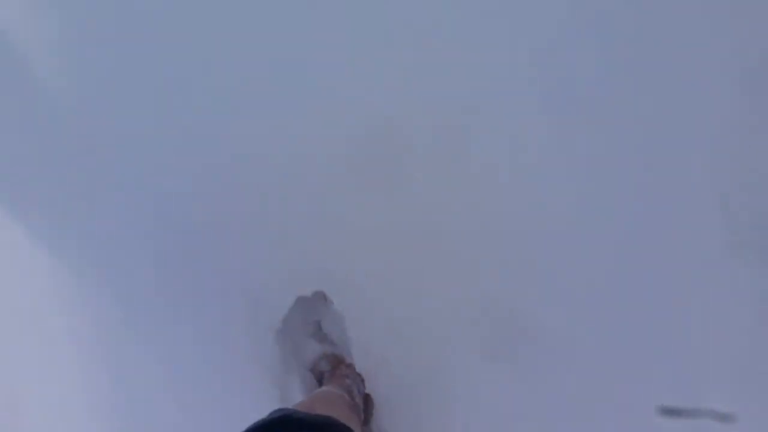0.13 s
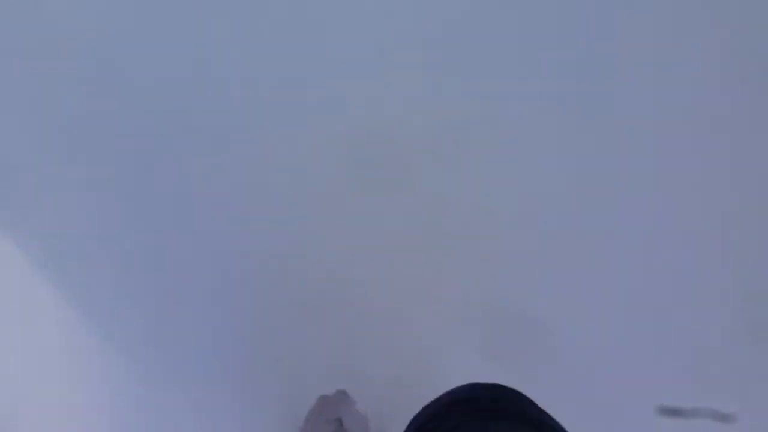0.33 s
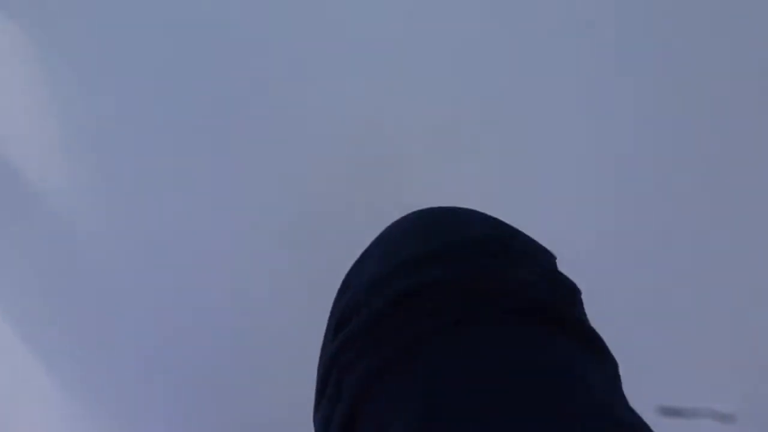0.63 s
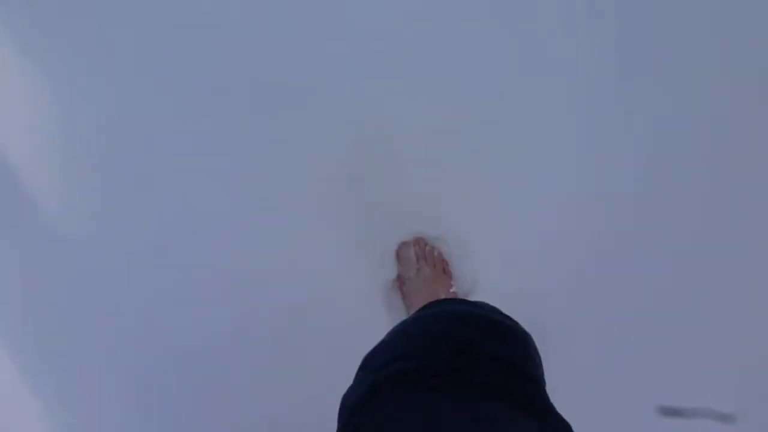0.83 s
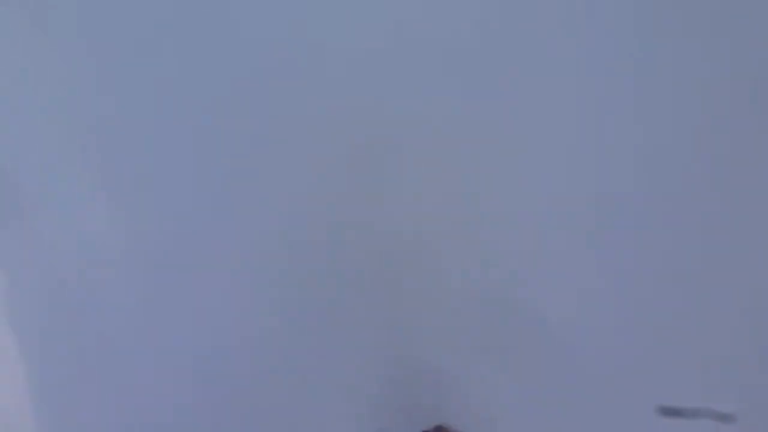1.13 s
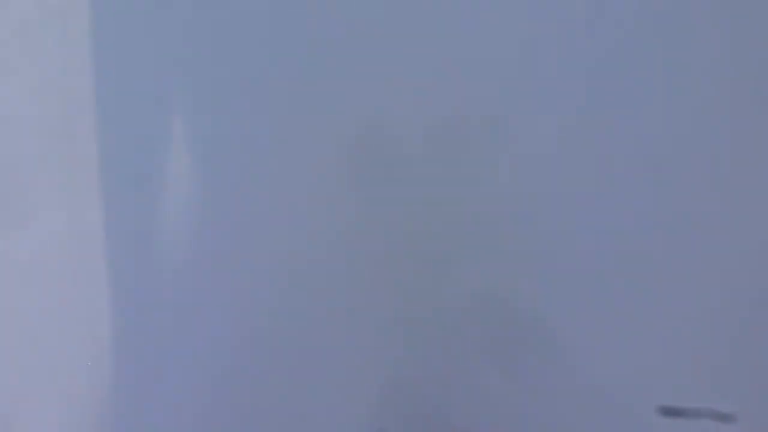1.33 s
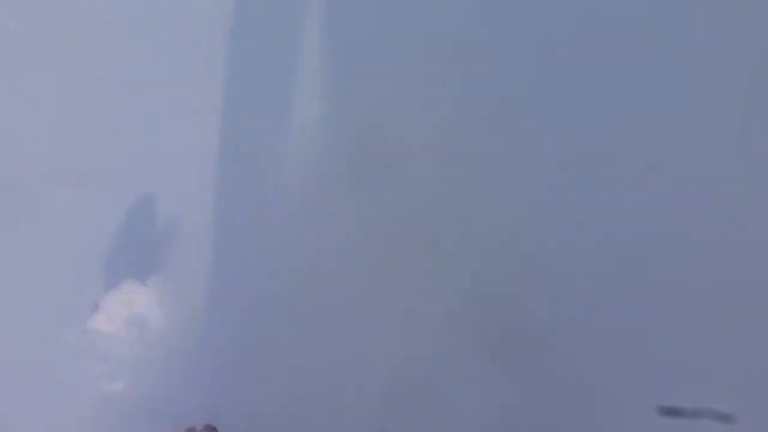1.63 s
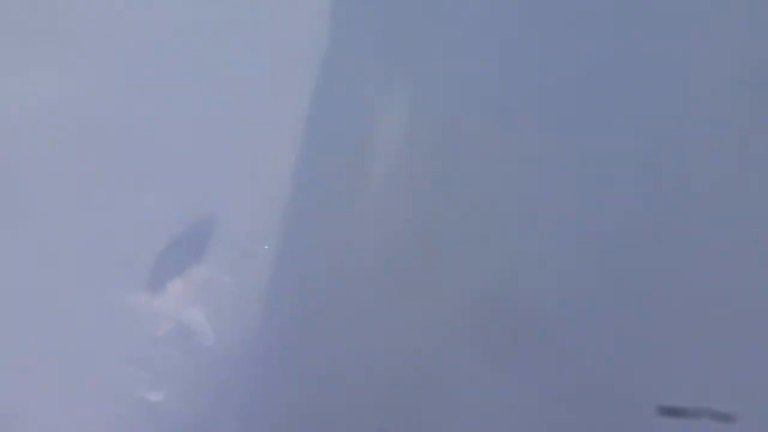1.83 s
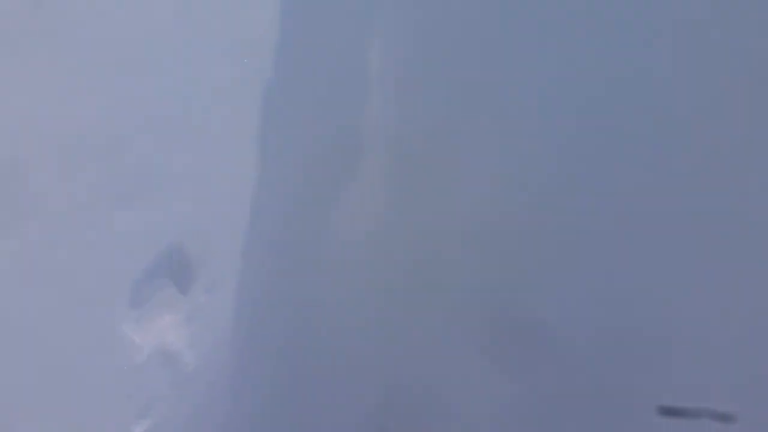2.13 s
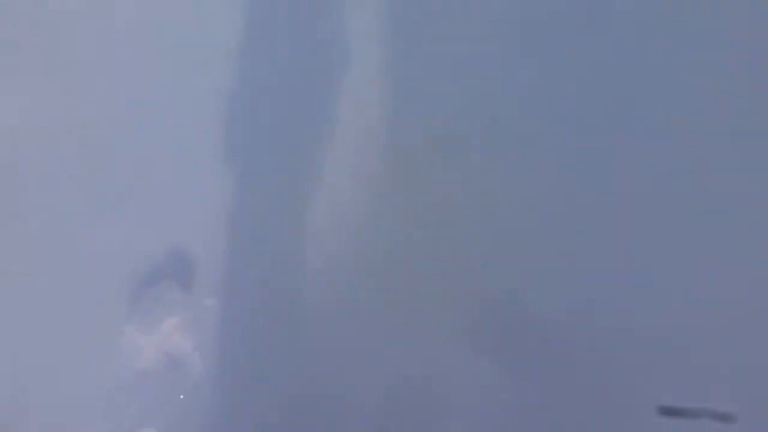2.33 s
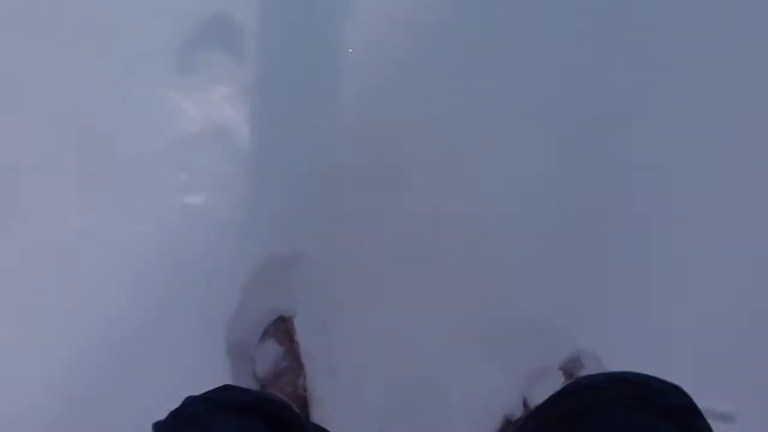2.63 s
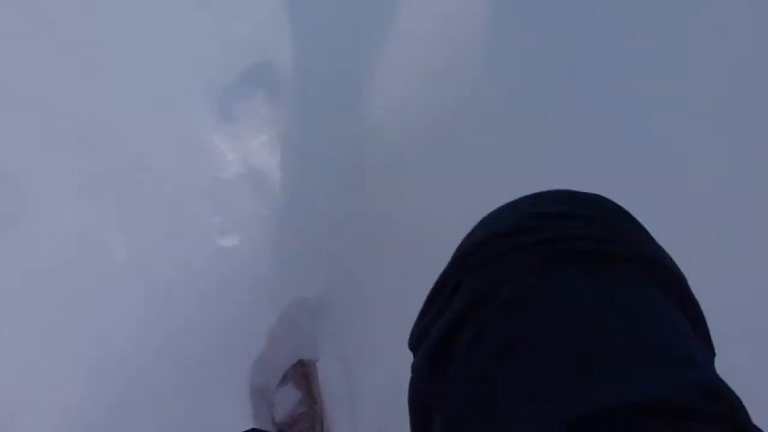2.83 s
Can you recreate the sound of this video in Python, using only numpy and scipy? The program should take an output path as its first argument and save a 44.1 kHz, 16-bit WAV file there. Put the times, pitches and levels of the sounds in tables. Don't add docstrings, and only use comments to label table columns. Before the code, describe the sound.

Close handheld outdoor pickup of barefoot snow steps, grainy and crackling, the second much the loudest, the third softer, with small crust cracks between them, low wind thuds, soft gust roar and a dull, muffled treble.

```python
import sys
import numpy as np
from scipy import signal
from scipy.fft import rfft, irfft, next_fast_len
from scipy.io import wavfile
from scipy.ndimage import uniform_filter1d

SR = 44100
rng = np.random.default_rng(int(sys.argv[2]) if len(sys.argv) > 2 else 0)


def to_wav(s):
    ch = np.atleast_2d(s).T
    pcm = np.round(np.clip(ch, -1, 1) * 32767)
    wavfile.write(sys.argv[1], SR, pcm.astype(np.int16))


def level_to_linear(level):
    exponent = np.asarray(level, float) / 20
    return 10 ** exponent


N = 130977

# time in seconds, crunch level in dB, packing level in dB relative to crunch, fine crystal
# level in dB relative to crunch.
FOOT_PRESSURE = [
    [(.18, -60.5, 9, -16), (.26, -46.5, 11.5, -13), (.3, -42.5, 9, -24), (.32, -47, 16, -17),
     (.345, -39.5, 9, -15.5), (.375, -43.5, 15, -13), (.42, -48.5, 11, -14), (.435, -52, 10.5, -3.5),
     (.52, -54.5, 5, -9)],
    [(.735, -42.5, 5, 1), (.748, -34, 1.5, -3.5), (.8, -32, -3.5, -4.5), (.87, -39, 1.5, -0.5),
     (.92, -35, -3.5, -5.5), (.99, -41, 5.5, -7.5), (1.1, -36.5, -3.5, -14.5), (1.27, -40.5, -1.5, -6),
     (1.348, -41.5, 4.5, -7.5)],
    [(1.89, -54.5, 7, -1), (1.93, -44, 5, -4), (1.99, -46.5, 5, -3.5), (2.08, -46.5, 4.5, -4),
     (2.16, -48, 5.5, -8), (2.225, -44, 4, -7), (2.3, -48, 2, -9.5), (2.4, -52, 4, -12), (2.45, -56, 0, 2)],
    [(1.34, -46.5, -14, -10), (1.46, -47.5, 4.5, -6), (1.51, -47, 5, -6.5), (1.56, -49.5, 8.5, -3),
     (1.59, -56.5, 3, -5.5), (1.64, -50.5, 7, 0), (1.68, -48, 8.5, -1.5), (1.76, -49.5, 7.5, 0),
     (1.9, -54, 9.5, 0)],
    [(2.44, -56.5, 9, -6), (2.5, -51.5, 7, -4), (2.56, -62.5, 6, -12), (2.64, -60, 10, -10),
     (2.75, -54, 5, -6), (2.8, -57, 2, -5), (2.85, -48.5, -1, -12), (2.9, -52, 6, -3), (2.98, -63, 10, -8)],]
# start in seconds, length in seconds (at most 0.16 s sounds), level in
# dB, centre in Hz, half bandwidth as a share of the centre (0-1).
CRUST_CLUMPS = [(.225, .002, -34, 900, .5), (.27, .15, -45, 1450, .25), (.328, .016, -43, 4300, .22),
                (.38, .042, -45, 4400, .25), (.43, .3, -60, 4150, .07), (.442, .022, -36, 800, .1),
                (.76, .57, -46, 1800, .22), (.795, .006, -36, 4500, .4), (.81, .045, -42, 3300, .12),
                (.908, .018, -42, 3900, .25), (1.0, .335, -48, 6000, .1), (1.24, .1, -44, 2900, .25),
                (1.53, .03, -49, 4800, .35), (1.572, .004, -44, 4300, .65), (1.606, .006, -53, 4800, .5),
                (1.66, .62, -50, 1300, .3), (1.675, .008, -46, 3800, .5), (1.745, .008, -46, 3800, .5),
                (1.94, .025, -49, 4900, .15), (2.14, .14, -58, 5500, .03), (2.417, .002, -35, 800, .5),
                (2.657, .012, -33, 490, .2), (2.673, .002, -35, 1400, .6)]
# start in seconds, peak in dB, pitch in Hz, 60 dB decay in seconds.
CRUST_CRACKS = [(.2245, -27, 800, .006), (.274, -29, 1020, .012), (.3005, -30, 2300, .006),
                (.333, -25, 950, .02), (.3478, -19, 1050, .014), (.3515, -23, 900, .012),
                (.366, -20, 840, .02), (.371, -24, 800, .02), (.388, -28, 1100, .015),
                (.4295, -26, 800, .008), (.491, -31, 660, .02), (.7452, -23, 2300, .006),
                (.7745, -21, 900, .006), (.7747, -28, 5200, .004), (.798, -23, 4000, .005),
                (.846, -27, 620, .03), (.921, -28, 3900, .006), (1.126, -27, 600, .02),
                (1.148, -27, 2600, .005), (1.221, -28, 2700, .008), (1.2926, -29, 2590, .008),
                (2.077, -30, 650, .015), (2.102, -29, 900, .008), (2.143, -32, 1700, .008),
                (2.205, -29, 900, .012), (2.4175, -27, 800, .006), (2.6555, -31, 600, .012)]
# centre in seconds, peak in dB, pitch in Hz, width in seconds.
WIND_POPS = [(0.18, -24.5, 257, 0.0089), (0.211, -23, 330, 0.0022), (0.228, -22.5, 231, 0.0069),
             (0.407, -33, 366, 0.0034), (0.75, -14.5, 379, 0.0041), (0.775, -31, 354, 0.0032),
             (0.802, -36, 405, 0.011), (1.008, -29, 369, 0.0072), (1.046, -24.5, 301, 0.006),
             (1.083, -49, 353, 0.0062), (1.342, -14.5, 330, 0.0032), (1.357, -24, 256, 0.0021),
             (1.424, -24, 277, 0.0044), (1.473, -23.5, 260, 0.0036), (1.485, -17, 260, 0.0048),
             (1.504, -27, 304, 0.0027), (1.578, -22.5, 285, 0.0038), (1.608, -27.5, 227, 0.0049),
             (1.619, -29, 299, 0.0072), (1.724, -40.5, 201, 0.0045), (1.749, -23.5, 254, 0.0043),
             (1.874, -32.5, 287, 0.008), (1.962, -26.5, 219, 0.0062), (2.228, -29, 270, 0.0087),
             (2.37, -25, 320, 0.0034), (2.389, -26, 305, 0.0048), (2.42, -19.5, 275, 0.0038),
             (2.672, -25.5, 296, 0.0053)]
# centre in seconds, peak in dB, pitch in Hz, width in
# seconds.
WIND_FLUTTER = [(.13, -40.5, 85, .015), (.32, -46, 80, .012), (1.3355, -22, 370, .004),
                (1.3465, -27, 330, .003), (1.398, -35, 190, .007), (1.483, -27, 300, .003),
                (1.492, -30, 200, .006), (1.53, -41, 90, .012), (1.543, -32, 300, .006),
                (1.586, -32, 170, .007), (1.68, -33, 220, .007), (1.83, -41, 90, .012),
                (1.868, -28, 300, .005), (1.945, -34, 140, .009), (2.1, -43, 80, .014),
                (2.235, -38, 110, .012), (2.315, -38, 100, .015), (2.67, -38, 120, .01),
                (2.705, -35, 160, .008), (2.905, -43, 80, .014)]
# time in seconds, rumble level in dB, open air level in dB.
GUST_CURVE = [(0, -66.5, 2), (.13, -65, 4), (.25, -62, 5.5), (.33, -77.5, 2.5), (.72, -84.5, 2),
              (.76, -42.5, 7.5), (.85, -79, 2.5), (1.25, -60, 2.5), (1.38, -52, -1.5), (1.62, -51.5, -6),
              (1.85, -48.5, -3.5), (2, -62.5, -1.5), (2.12, -60.5, 1.5), (2.32, -52.5, -1),
              (2.43, -54.5, 2), (2.47, -66, -1), (2.68, -69, 1), (2.97, -70.5, -0.5)]
# frequency in Hz, level in dB.
RUMBLE_SPECTRUM = [(30, -29.5), (80, -4.5), (150, 0), (280, -1.5), (450, -4.5), (700, -42.5)]
# frequency in Hz, level in dB.
AIR_SPECTRUM = [(40, -52), (130, -46), (260, -6), (700, -2.5), (1100, -8.5), (1900, -24.5), (3600, -24.5),
                (5000, -32.5)]
# frequency in Hz, gain in dB.
BAND_EDGE = [(5000, -1), (6500, -6.5), (7200, -16.5), (7600, -28.5), (7780, -34.5), (7850, -67)]


def evened(x):
    return x / np.sqrt(np.mean(x ** 2) + 1e-20)


def read(points, hz):
    f, value = np.transpose(points)
    return np.interp(np.log(hz + 1), np.log(f + 1), value)


def along(rows, axis):
    rows = np.array(rows)
    return np.interp(np.arange(N) / SR, rows[:, 0], rows[:, axis])


def add(mix, s, sound):
    part = mix[round(s * SR):][:len(sound)]
    part += sound[:len(part)]


def grains(span_hz, per_s, cycles, spread_db, count=24):
    size = level_to_linear(spread_db * np.minimum(rng.exponential(1, N), 3.2))
    size = size * rng.choice([-1, 1], N)
    size = size * (rng.random(N) < per_s / SR)
    kind = rng.integers(0, count, N)
    t, out = np.arange(1024) / SR, np.zeros(N)
    for k, hz in enumerate(np.geomspace(*span_hz, count)):
        u = t * hz / cycles
        snap = u * np.exp(-2 * u) * np.sin(2 * np.pi * hz * t)
        out += signal.oaconvolve(size * (kind == k), snap)[:N]
    return evened(out)


def snow():
    crunch = grains((2297, 4220), per_s=6000, cycles=4.2, spread_db=2.0)
    packing = grains((480.4, 2075), per_s=2500, cycles=2.93, spread_db=3.8)
    fine = grains((4410, 7720), per_s=8300, cycles=2.9, spread_db=6.2)
    t, out = np.arange(N) / SR, np.zeros(N)
    for step in FOOT_PRESSURE:
        start, end = step[0][0], step[-1][0]
        gate = np.clip(np.minimum(t - start, end - t) / 0.01, 0, 1)
        mix = crunch + level_to_linear(along(step, axis=2)) * packing + level_to_linear(along(step, axis=3)) * fine
        out += gate * level_to_linear(along(step, axis=1)) * mix
    return out


def clumps():
    rise_s, out = .0018, np.zeros(N)
    for s, length, db, hz, share in CRUST_CLUMPS:
        wide = np.clip(share, .02, .7)
        edges = [hz * (1 - wide), hz * (1 + wide)]
        sos = signal.butter(4, edges, "band", fs=SR, output="sos")
        band = signal.sosfilt(sos, rng.standard_normal(8192))[1024:]
        t = np.arange(len(band)) / SR
        shape = np.clip(np.minimum(t, length + rise_s - t) / rise_s, 0, 1)
        rms = np.sqrt(np.mean((band ** 2)[shape > .5]))
        add(out, s, level_to_linear(db) * shape * band / rms)
    return out


def cracks():
    rise_s, sag = .0004, .08
    out, t = np.zeros(N), np.arange(2048) / SR
    for s, db, hz, t60 in CRUST_CRACKS:
        pitch = hz * (1 - sag * np.minimum(t / t60, 1))
        turns = np.cumsum(pitch) / SR
        envelope = level_to_linear(db - 60 * t / t60) * (1 - np.exp(-t / rise_s))
        add(out, s, envelope * 2 * np.sin(2 * np.pi * turns))
    return out


def pops():
    fall, span, edge = 0.35, 1.23, 0.26
    out = np.zeros(N)
    for s, db, hz, width in WIND_POPS + WIND_FLUTTER:
        u = np.arange(-1, 4, 1 / (SR * width * span))
        shape = np.where(u < 0, np.exp(-(u / edge) ** 2), np.exp(-u / .5))
        turns = np.cumsum(hz * np.exp(-fall * np.clip(u, -1, 1.5))) / SR
        phase = 2 * np.pi * (turns - np.interp(0, u, turns))
        swing = np.cos(phase) + 0.059 * np.cos(2 * phase)
        add(out, s - width * span, level_to_linear(db) * shape * swing)
    return out


def gain_control():
    duck_per_db, duck_from_db, recover_s = 0.1266, -31.5, 0.096
    kicks = np.zeros(N)
    for s, db, _, _ in WIND_POPS:
        kick = max(db - duck_from_db, 0) * duck_per_db
        add(kicks, s + 0.0019, np.array([kick]))
    dip = signal.lfilter([1], [1, -np.exp(-1 / (SR * recover_s))], kicks)
    return level_to_linear(-uniform_filter1d(dip, size=200))


def noise(spectrum, size, patchy_db, flicker_db):
    frames, hz = 4 * N // size + 5, np.fft.rfftfreq(size, 1 / SR)
    a, b, patches = rng.standard_normal((frames, len(hz), 3)).T
    patches = uniform_filter1d(patches, size=size // 64, axis=0)
    patches = evened(uniform_filter1d(patches, size=8, axis=1))
    flicker = evened(uniform_filter1d(rng.standard_normal(frames), size=4))
    level_db = read(spectrum, hz)[:, None] + patchy_db * patches + flicker_db * flicker
    z = (a + 1j * b) * level_to_linear(level_db)
    return evened(signal.istft(z, nperseg=size, noverlap=3 * size // 4)[1][:N])


def rumble():
    roar = noise(RUMBLE_SPECTRUM, size=1024, patchy_db=2.0, flicker_db=3.5)
    return level_to_linear(along(GUST_CURVE, axis=1) + 6.5) * roar


def open_air():
    hiss = noise(AIR_SPECTRUM, size=512, patchy_db=-0.17, flicker_db=1.2)
    return level_to_linear(along(GUST_CURVE, axis=2) - 38.5) * hiss


def scene():
    heard = open_air() + snow() + clumps() + cracks()
    return (heard * gain_control() + rumble() + pops())[None]


def roll_off(x):
    return signal.sosfilt(signal.butter(12, 15720, fs=SR, output="sos"), x)


def record(dry):
    sample_hz, image_db = 16000, -63.5
    cut = signal.sosfilt(signal.butter(4, 75, "high", fs=SR, output="sos"), dry)
    cut = .3 * np.tanh(cut / .3)
    size = next_fast_len(N + 4096)
    hz = np.fft.rfftfreq(size, 1 / SR)
    band = irfft(rfft(cut, size) * level_to_linear(read(BAND_EDGE, hz)), size)[:, :N]
    mirror = 2 * band * np.cos(2 * np.pi * sample_hz * np.arange(N) / SR)
    image_gain = (hz < sample_hz) * (hz > 9400) * (sample_hz / (hz + 1)) ** 4.1
    mirror = irfft(rfft(mirror, size) * image_gain, size)[:, :N]
    return roll_off(band + level_to_linear(image_db) * mirror)


dry = scene()
out = record(dry)
to_wav(out)
```